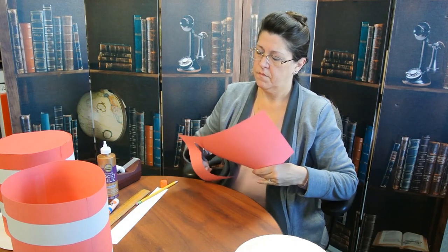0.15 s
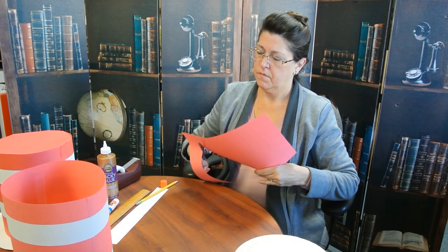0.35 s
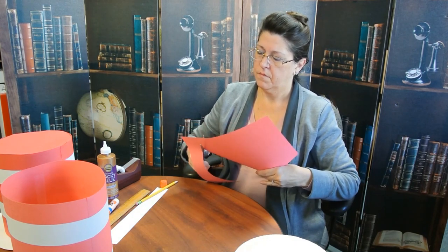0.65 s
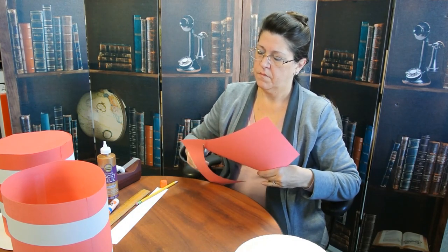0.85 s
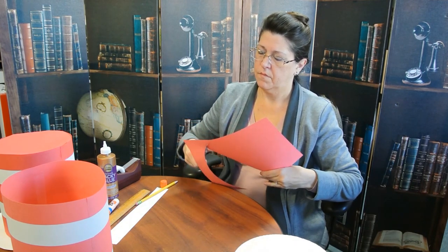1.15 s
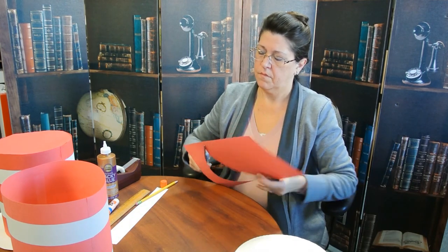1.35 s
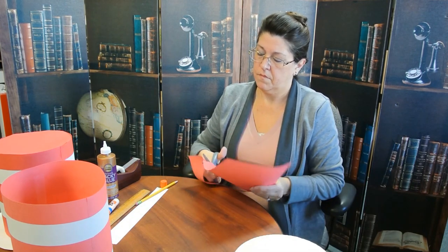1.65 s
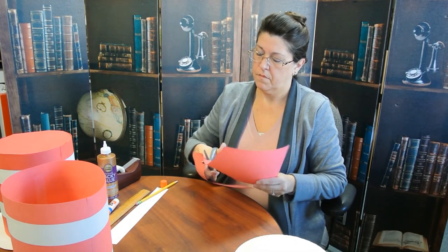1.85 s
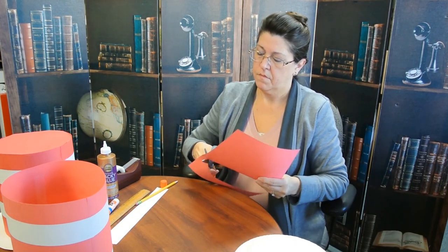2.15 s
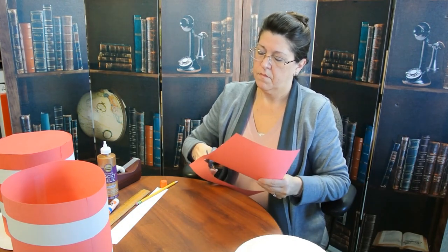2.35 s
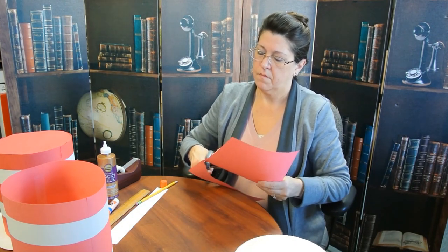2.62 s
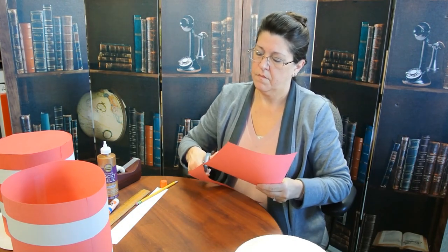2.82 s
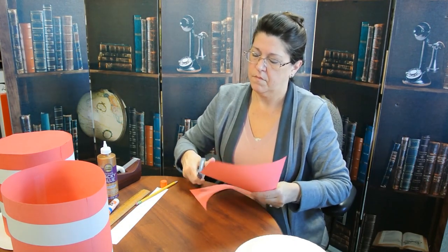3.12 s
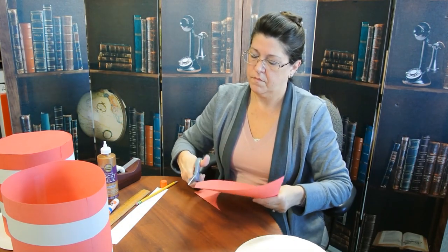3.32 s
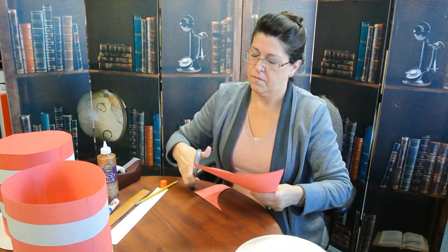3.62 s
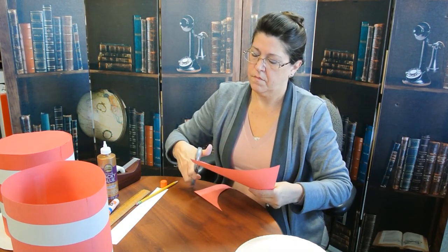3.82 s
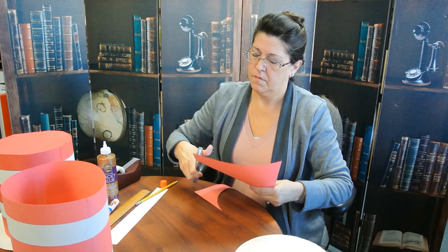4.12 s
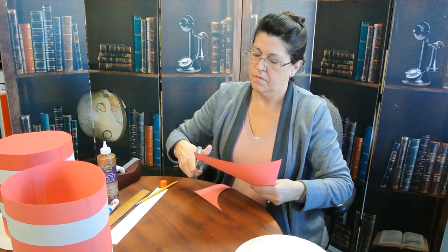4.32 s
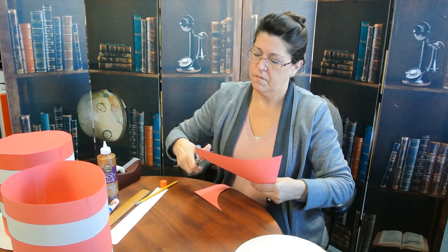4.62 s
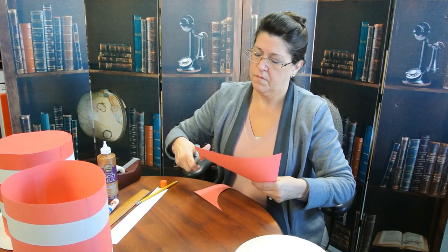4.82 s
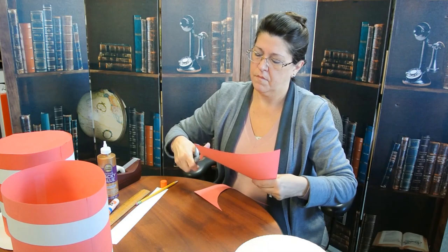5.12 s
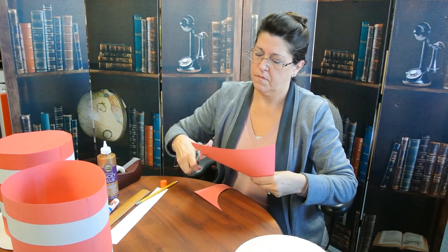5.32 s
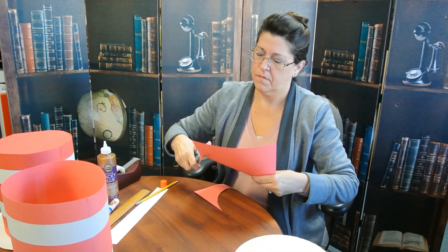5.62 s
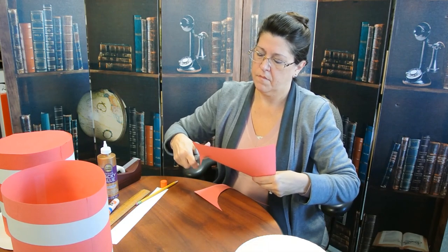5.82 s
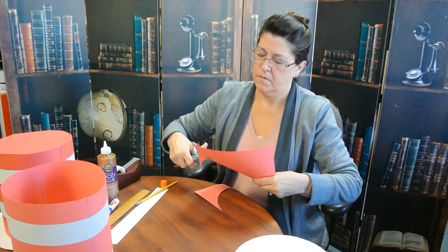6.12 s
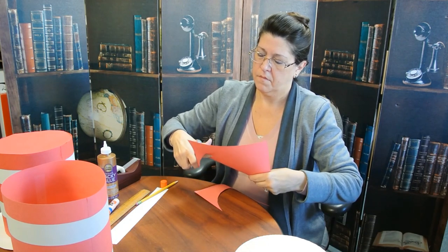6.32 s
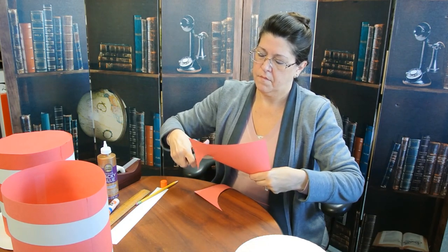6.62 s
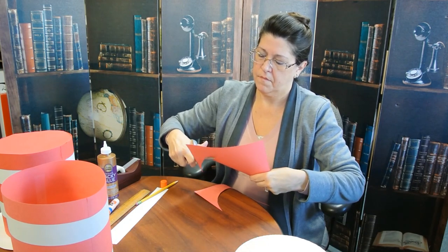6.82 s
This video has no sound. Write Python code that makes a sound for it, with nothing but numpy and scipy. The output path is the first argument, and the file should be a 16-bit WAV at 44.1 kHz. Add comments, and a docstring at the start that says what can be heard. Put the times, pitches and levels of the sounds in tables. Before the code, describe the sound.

Close, crisp paper cutting with irregular snips and crackly rustles in a quiet small room, with a loud snap of metal blades late on.

```python
"""Scissors cut a curve through stiff paper above a wooden table in a small room: noise made of random fibre snaps
is coloured by the sheet, split into body, crackle and fizz, and shaped by each cut and rustle.
Buckles are short filtered noise bursts, and the blades tick and once clack shut as decaying steel modes.
An offcut drops as table modes and slides as noise in a sinking resonance.
Behind lie shaped noise for the air, a low drone (sine plus narrow noise) that swells and fades, and a faint whine."""
import sys
import numpy as np
from scipy import signal
from scipy.fft import rfft, irfft
from scipy.io import wavfile
from scipy.ndimage import uniform_filter1d

SR = 44100
rng = np.random.default_rng(int(sys.argv[2]) if len(sys.argv) > 2 else 0)


def log_audio(samples):
    """Write samples as a 16-bit WAV file to the path given in sys.argv[1]."""
    # one column per channel
    frames = np.atleast_2d(samples).T
    # limit to full scale, then quantise
    limited = np.clip(frames, -1, 1)
    pcm = np.round(limited * 32767).astype(np.int16)
    wavfile.write(sys.argv[1], SR, pcm)


N = 306936
TIME = np.arange(N) / SR
FULL_HZ = np.fft.rfftfreq(N, 1 / SR)
FILTER_HZ = np.fft.rfftfreq(4096, 1 / SR)  # frequency grid on which the colouring filters are designed


def amp(db):
    """Level law: decibels to amplitude gain."""
    return 10 ** (np.asarray(db) / 20)


def unit(x):
    """Normalisation: scales a signal to rms 1."""
    return x / np.sqrt(np.mean(x ** 2) + 1e-20)


def decay(t, t60):
    """Exponential decay: the amplitude falls 60 dB in t60 seconds."""
    return np.exp(-np.log(1000) * t / t60)


def read(points, hz):
    """Interpolation: reads a curve in dB or seconds along a logarithmic frequency axis."""
    f, value = np.transpose(points)
    return np.interp(np.log(hz + 1), np.log(f + 1), value)


def add(mix, s, sound):
    """Superposition: adds a sound to the mix from time s."""
    part = mix[max(round(s * SR), 0):][:len(sound)]
    part += sound[:len(part)]


def colour(x, db):
    """Minimum-phase filtering: the gain db on FILTER_HZ fixes the phase of a causal filter."""
    log_gain = np.log(amp(np.maximum(db, db.max() - 100)))
    analytic = signal.hilbert(np.r_[log_gain, log_gain[-2:0:-1]])
    impulse = np.fft.ifft(np.exp(np.conj(analytic))).real
    return signal.fftconvolve(x, impulse)[:len(x)]


def low_cut(x, hz, order=2):
    """Radiation efficiency: a small or thin object hardly radiates long waves."""
    return signal.sosfilt(signal.butter(order, hz, "highpass", fs=SR, output="sos"), x)


def pair(a, b, alike_hz, alike=0.43):
    """Spatial coherence: two microphones share the long waves of a spread-out sound, but less of the short ones."""
    same = min(alike, 1) / np.sqrt(1 + (np.fft.rfftfreq(len(a), 1 / SR) / alike_hz) ** 2)
    second = irfft(same * rfft(a) + np.sqrt(1 - same ** 2) * rfft(b), len(a))
    return np.array([a, second])


def murmur(hz, width_hz):
    """Resonance: noise through a double pole, shifted up to follow hz, at rms 1."""
    r = np.exp(-np.pi * width_hz / SR)
    noise = rng.standard_normal(N) + 1j * rng.standard_normal(N)
    slow = signal.lfilter([1], np.poly([r, r]), noise)
    phase = 2 * np.pi * np.cumsum(hz * np.ones(N)) / SR
    return unit((slow * np.exp(1j * phase)).real)


def struck(blows, modes):
    """Modal superposition: every blow rings the same decaying modes."""
    t, out = np.arange(SR // 3) / SR, np.zeros(N)
    ring = sum(amp(db) * decay(t, t60) * np.sin(2 * np.pi * hz * t) for hz, db, t60 in modes)
    for s, db in blows:
        add(out, s, amp(db) * ring)
    return out


# Spectral density of the snapping paper. Each row: frequency in Hz, density in dB per Hz.
PAPER_SPECTRUM = [(120, -46.5), (200, -17.5), (366, -17), (401, -11), (548, -10.5), (635, -2), (696, -8),
                  (1160, -7.5), (1450, -5.5), (5130, -2.5), (6280, -7), (7540, -3.5), (12400, -2.5),
                  (16000, -11.5)]
# Resonances of the sheet in the blades. Each row: frequency in Hz, width in Hz, lift in dB.
SHEET_MODES = [(612, 33, 5.5), (1306, 34, 3.5), (2260, 67, -2), (4850, 200, -0.5), (7150, 1600, 3)]


def cutting(body_hz=2000, fizz_hz=8000):
    """Filtered excitation: fibre snaps sound through the broad sheet (low), the cut (middle) and frayed edge (high)."""
    paper_db = read(PAPER_SPECTRUM, FILTER_HZ)
    for hz, width, db in SHEET_MODES:
        paper_db = paper_db + db / (1 + (2 * (FILTER_HZ - hz) / width) ** 2)
    spectrum = rfft([colour(side, paper_db) for side in fibres()])
    low = 1 / (1 + (FULL_HZ / body_hz) ** 4)
    high = 1 - 1 / (1 + (FULL_HZ / fizz_hz) ** 6)
    body, crackle, fizz = (unit(irfft(spectrum * share, N)) for share in (low, 1 - low - high, high))
    body_gain, crackle_gain, fizz_gain = effort()
    return body_gain * body + crackle_gain * crackle + fizz_gain * fizz


def fibres(per_s=9000, spread_db=3, clump_db=1.5, rub=0.43, flex_db=1.68):
    """Random impulse process: fibres snap in clumps over a smooth rub, partly alike at the two microphones."""
    sizes = amp(spread_db * np.minimum(rng.exponential(1, N), 4)) * (rng.random(N) < per_s / SR)
    snaps = unit(sizes * rng.choice([-1, 1], (2, N))) + rub * rng.standard_normal((2, N))
    drift = unit(uniform_filter1d(rng.standard_normal(N), size=170))  # averaged over about 4 ms
    clumps = amp(clump_db * np.clip(drift, -2, 2))
    z = signal.stft(pair(*(snaps * clumps), alike_hz=3680, alike=0.57), nperseg=512)[2]
    # the colour shifts a little as the sheet flexes
    across_hz = uniform_filter1d(rng.standard_normal(z.shape[1:]), size=9, axis=0)
    flex = unit(uniform_filter1d(across_hz, size=10, axis=1))
    return signal.istft(z * amp(flex_db * flex), nperseg=512)[1][:, :N]


def effort():
    """Power addition: cuts, rustles and the holding hand combine into gains of body, crackle and fizz."""
    holding = (np.ones(N), -63.5, 0.5, -10.5)  # the held sheet is never quite still
    gain, db, body, fizz = map(np.array, zip(*cuts(), *rustles(), holding))
    return np.sqrt(amp([db + body, db, db + fizz]) ** 2 @ gain ** 2)


# The blades shear through the sheet. Each row: start in seconds, end in seconds, crackle level in dB,
# swell over the cut in dB, sheet body in dB re crackle, fine fizz in dB re crackle.
CUTS = [(0.01, 0.097, -30, -5, -10, -3.5), (0.431, 0.584, -36.5, -2, -8, -6.5),
        (0.608, 0.875, -40, 3, -8.5, -8.5), (0.934, 1.215, -41, 1.5, -5, -10),
        (1.577, 1.876, -37.5, -7, -7.5, -5), (2.276, 2.573, -40, -3.5, -8, -5.5),
        (2.619, 2.838, -46.5, 2.5, -6, -3.5), (4.066, 4.337, -52, 0, -4.5, -4.5),
        (4.332, 4.536, -45.5, -1.5, -8, -7), (4.554, 4.75, -44, 4, -7, -7),
        (5.11, 5.29, -39.5, -11.5, -9, 1.5), (5.559, 5.776, -38.5, 2.5, -4.5, -7.5),
        (5.859, 6.017, -40.5, 1, -1, -8), (6.549, 6.786, -38, -3.5, -1, -5.5),
        (6.822, 6.96, -36, -3, 0.5, -4.5)]


def cuts():
    """Progressive fracture: each cut gives its gain over time, crackle dB, body dB and fizz dB."""
    return [(shear(start, end, swell_db), db, body, fizz) for start, end, db, swell_db, body, fizz in CUTS]


BITE_S, RELEASE_DB_PER_S = 0.036, 193  # the blades bite quickly; the sheet settles after each cut


def shear(start, end, swell_db):
    """Shearing force: the gain of one cut rises as the blades bite, changes as they press on, and lets go."""
    bite = np.clip((TIME - start) / BITE_S, 0, 1)
    along = np.clip((TIME - start) / (end - start), 0, 1) - .5
    settle_db = RELEASE_DB_PER_S * np.clip(TIME - end, 0, 1)
    return np.sin(np.pi / 2 * bite) ** 2 * amp(swell_db * along - settle_db)


# The sheet slides and flexes in the hands. Each row: loudest moment in seconds, rise in seconds,
# fall in seconds, crackle level in dB, sheet body in dB re crackle, fine fizz in dB re crackle.
RUSTLES = [(0, .02, 0.041, -35.5, -7, -10), (.228, 0.028, 0.043, -39, -7.5, -4.5),
           (1.304, 0.038, 0.064, -35.5, -14.5, 0), (1.477, 0.047, 0.054, -43.5, -6.5, 2.5),
           (1.565, 0.041, 0.045, -38, -7.5, -7), (2.04, 0.069, 0.093, -39.5, -7.5, -4),
           (2.262, 0.04, 0.048, -51, -5, -5), (2.902, 0.0095, 0.029, -45.5, -3, 0),
           (2.97, 0.048, .08, -47, 1, -4), (3.187, 0.046, 0.055, -37.5, -9, -8.5),
           (3.305, 0.04, 0.076, -48, -6, -5), (3.513, 0.032, 0.038, -46, 3.5, -15),
           (3.749, .004, 0.024, -52.5, -2.5, 0), (3.885, .035, 0.027, -51, -3, 1.5),
           (4.935, 0.027, .035, -44.5, -11.5, -6), (5.125, 0.055, .02, -48, -4, -5),
           (5.49, 0.063, 0.17, -43, -11.5, -2), (5.84, 0.032, 0.051, -44, -5, -19),
           (6.155, 0.027, 0.093, -40.5, -6.5, -1.5), (6.26, 0.08, 0.096, -38, -5.5, -4),
           (6.545, 0.053, 0.048, -42, -7.5, -11)]


def rustles():
    """Friction and flexure: each rustle gives its gain over time, crackle dB, body dB and fizz dB."""
    return [(amp(swell(at, rise, fall)), db, body, fizz) for at, rise, fall, db, body, fizz in RUSTLES]


SWELL_DB, SWELL_SHAPE = 11, 1.5  # drop one rise before or one fall after the top; roundness of the top


def swell(at, rise, fall):
    """Amplitude envelope: a rounded swell in dB, 0 at its top."""
    away = np.maximum((at - TIME) / rise, (TIME - at) / fall)
    return -SWELL_DB * np.minimum(away, 20) ** SWELL_SHAPE


# The stiff sheet snaps, buckles or scrapes. Each row: start in seconds, level in dB, centre in Hz,
# width in octaves, decay time t60 in seconds.
SNAPS = [(.082, -22.5, 480, 0.41, 0.022), (.1, -23.5, 855, 0.39, 0.01), (0.23, -29.5, 4200, 0.59, 0.0098),
         (0.9273, -29, 2730, 1.2, 0.021), (.947, -29, 2720, 0.77, 0.027), (0.95, -40.5, 2480, 0.2, 0.5),
         (1.419, -43, 480, 0.81, 0.3), (1.445, -44, 660, 0.43, 0.18), (1.847, -24, 530, 0.53, 0.078),
         (1.849, -26, 1720, 0.66, 0.16), (1.865, -31.5, 750, 0.74, 0.13), (2.815, -31, 5000, 1.6, .0071),
         (2.949, -28.5, 3000, 1.1, 0.033), (2.949, -32.5, 930, 1.18, 0.21),
         (3.1699, -19.5, 4160, 0.64, 0.0093), (3.172, -22.5, 1190, 0.27, 0.013),
         (5.644, -26.5, 4500, 0.91, 0.03), (5.825, -33, 2400, 1.1, .01), (5.936, -28.5, 2180, 1.6, 0.082),
         (5.982, -27, 1500, 1.9, 0.034), (6.452, -40.5, 2410, 0.33, 0.081), (6.451, -38, 6000, 1.5, 0.066),
         (6.482, -32.5, 2360, 0.53, 0.046), (6.484, -33.5, 5470, 2.5, .08), (6.575, -39, 1190, 0.51, 0.43),
         (6.658, -27, 6500, 1.3, .005), (6.895, -25.5, 1400, 1.3, .042)]


def buckling(skirt_db=20):
    """Snap-through instability: a bend flips in a short dying flutter, lower when a larger patch moves."""
    t, out = np.arange(SR // 5) / SR, np.zeros((2, N))
    for s, db, hz, octaves, t60 in SNAPS:
        fade = decay(t, t60)
        away = np.log2((FILTER_HZ + 1) / hz) / octaves
        band_db = -skirt_db * np.log10(1 + away ** 2 / 2 + (away / 2) ** 4)
        flutters = pair(*rng.standard_normal((2, len(t))), alike_hz=4000, alike=1.0)
        for side, flutter in zip(out, flutters):
            burst = colour(fade * flutter, band_db)
            # give the burst the energy of its fade, whatever its bandwidth
            add(side, s, amp(db) * burst * np.linalg.norm(fade) / np.linalg.norm(burst))
    return out


# The blades meet. Each row: time in seconds, level in dB.
CLACKS = [(2.222, -27), (2.2282, -34), (2.948, -25), (3.172, -28), (3.747, -43), (4.921, -31), (5.133, -7)]
# The blades rebound as they meet. Each row: time after contact in seconds, level in dB re the clack.
CHATTER = [(0, -32), (.0005, 2.5), (.0013, -11)]
# Steel blades, damped by the hand. Each row: frequency in Hz, level in dB, decay time t60 in seconds.
BLADE_MODES = [(2850, -21, 0.004), (4430, -8, 0.0061), (6130, -8, 0.0017), (8040, -7, 0.006),
               (10000, -0.5, 0.0016), (12800, -19, 0.009), (5040, -35, 0.15), (9130, -50, 0.11),
               (11700, -39, .22)]


def scissors(cut_hz=1500):
    """Impact excitation: steel meets steel with a brief chatter and rings its modes."""
    blows = [(s + late, db + rebound_db) for s, db in CLACKS for late, rebound_db in CHATTER]
    return low_cut(struck(blows, BLADE_MODES), cut_hz, order=3)


# The offcut lands on the table. Each row: time in seconds, level in dB.
LANDINGS = [(3.172, -34.5), (3.195, -37.5)]
# Wooden table. Each row: frequency in Hz, level in dB, decay time t60 in seconds.
TABLE_MODES = [(146.6, -2.5, 0.205), (232, -2.5, 0.086), (330, -5, 0.036), (426, -2, 0.041),
               (734, -1, 0.029)]


def landing():
    """Impact excitation: the falling offcut rings the modes of the table."""
    return low_cut(struck(LANDINGS, TABLE_MODES), hz=94)


# the curled offcut slides and relaxes
SLIDE_AT_S, SLIDE_RISE_S, SLIDE_FALL_S, SLIDE_DB = 3.365, 0.11, .1, -44.5
# its resonance sinks steadily from curled to flat
CURLED_HZ, FLAT_HZ, UNCURL_AT_S, SAG_HZ_PER_S = 481, 252, 3.3, 1550


def sliding(width_hz=100, cut_hz=190, edge_hz=430, edge_width_hz=220, edge_db=-4, edge_fall_s=0.19):
    """Moving resonance: the offcut's pitch sinks as the curl opens; its edge rubs the table a little longer."""
    hz = np.clip(CURLED_HZ - SAG_HZ_PER_S * (TIME - UNCURL_AT_S), FLAT_HZ, CURLED_HZ)
    curl = amp(swell(SLIDE_AT_S, SLIDE_RISE_S, SLIDE_FALL_S)) * murmur(hz, width_hz)
    edge_level = amp(edge_db + swell(SLIDE_AT_S, SLIDE_RISE_S, edge_fall_s))
    edge = edge_level * murmur(edge_hz, edge_width_hz)
    return amp(SLIDE_DB) * low_cut(curl + edge, cut_hz, order=4)


# Decay of the room. Each row: frequency in Hz, decay time t60 in seconds.
ROOM_DECAY = [(150, 0.25), (1000, 0.29), (4000, 0.049), (14000, 0.14)]


def room(x, early_db, early_t60, tail_db):
    """Reverberation: sheet, hands and table scatter the sound after 2 ms; the walls ring on from 8 ms."""
    x, t = x * np.ones((2, 1)), np.arange(SR // 3) / SR
    early = pair(*rng.standard_normal((2, len(t))), alike_hz=1500) * decay(t, early_t60) * (t > .002)
    diffuse = pair(*rng.standard_normal((2, len(t))), alike_hz=900)
    hz, age, z = signal.stft(diffuse, SR, nperseg=256)
    z = z * decay(age, read(ROOM_DECAY, hz)[:, None])
    tail = signal.istft(z, nperseg=256)[1][:, :len(t)] * (t > .008)
    echoes = amp(early_db) * early / np.linalg.norm(early[0]) + amp(tail_db) * tail / np.linalg.norm(tail[0])
    return x + signal.fftconvolve(x, echoes, axes=1)[:, :N]


# Balance of paper and scissors. Each row: frequency in Hz, left minus right in dB.
BALANCE = [(100, 1.5), (600, 0.5), (1400, 0.6), (2800, 0.9), (5500, 5), (9000, 6.5), (13000, 1.5)]


def lean_left(near):
    """Stereo differences in level and time: louder on the left, where it arrives one sample later."""
    lean = amp(read(BALANCE, FULL_HZ) / 2)
    late = np.exp(-2j * np.pi * FULL_HZ / SR)
    return irfft(rfft(near) * [lean * late, 1 / lean], N)


# Spectral density of the room air. Each row: frequency in Hz, density in dB per Hz.
AIR_SPECTRUM = [(15, -30), (25, -8.5), (130, -6), (242, -13), (301, -7.5), (354, -12), (451, -10.5),
                (545, -13), (607, -8.5), (695, -16), (1130, -17), (3160, -18.5), (11000, -20.5),
                (16000, -23)]


def air(level_db=-52, rumble_hz=42):
    """Diffuse field: shaped noise, partly alike at the two microphones."""
    noises = [colour(rng.standard_normal(N), read(AIR_SPECTRUM, FILTER_HZ)) for _ in range(2)]
    a, b = (unit(low_cut(noise, rumble_hz)) for noise in noises)
    return amp(level_db) * pair(a, b, alike_hz=1150)


# the drone comes and goes; the gain of DRONE_DB is added to that of DRONE_REST_DB
DRONE_ON_S, DRONE_OFF_S, DRONE_FADE_S, DRONE_DB, DRONE_REST_DB = 3.94, 5.16, 0.093, -59, -74


def drone(hz=135, waver_hz=126, waver_width_hz=20, waver_db=-6):
    """Beating: a sine and a narrow noise close below it waver together, swelling and fading."""
    tone = np.sin(2 * np.pi * hz * TIME) + amp(waver_db) * murmur(waver_hz, waver_width_hz)
    on = np.clip(np.minimum(TIME - DRONE_ON_S, DRONE_OFF_S - TIME) / DRONE_FADE_S, 0, 1)
    return (amp(DRONE_REST_DB) + amp(DRONE_DB) * on) * tone


def whine(hz=600, width_hz=4.0, level_db=-72):
    """Narrow-band noise: a faint whine throughout."""
    return amp(level_db) * murmur(hz, width_hz)


def scene():
    """Superposition: paper and scissors in the room, over the background."""
    paper = cutting() + low_cut(buckling(), hz=298, order=3) + sliding() + landing()
    steel = scissors() * amp([[1.8], [-1.8]])  # the scissors sit further left than the sheet
    near = room(paper, early_db=-9.0, early_t60=0.056, tail_db=-12.0)
    near = near + room(steel, early_db=-2, early_t60=0.046, tail_db=-8)
    background = air() + drone() + whine()
    return lean_left(near) + background * amp([[1], [-1]])  # 2 dB louder on the left


def record(dry):
    """Band limitation: a linear-phase low-pass at 15.9 kHz."""
    low_pass = signal.firwin(511, 15900, window=("kaiser", 9), fs=SR)
    return signal.oaconvolve(dry, low_pass[None], "same")


dry = scene()
out = record(dry)
log_audio(out)
```